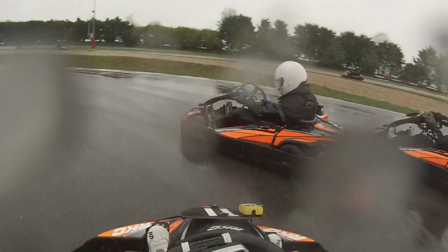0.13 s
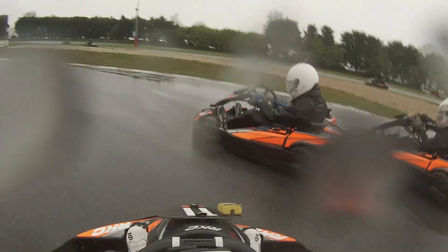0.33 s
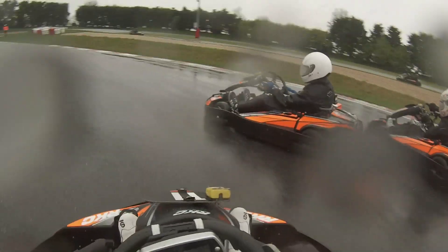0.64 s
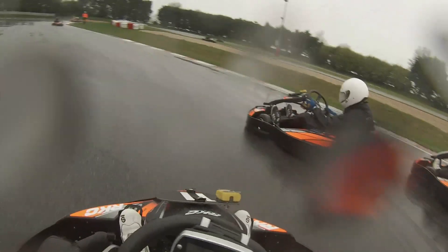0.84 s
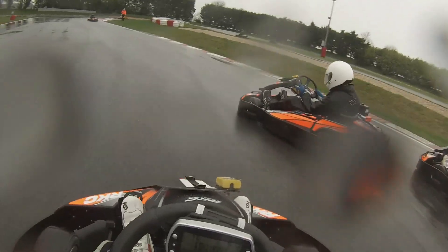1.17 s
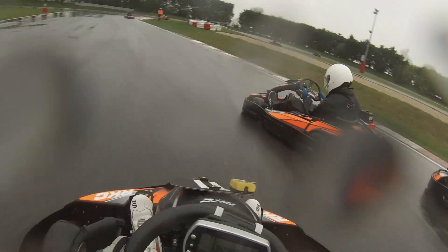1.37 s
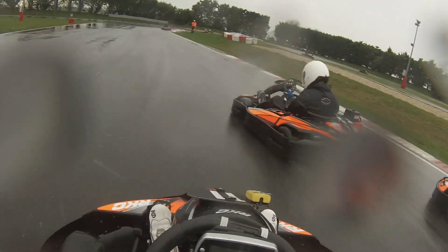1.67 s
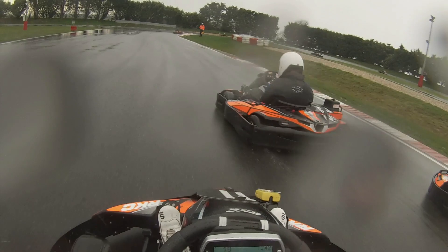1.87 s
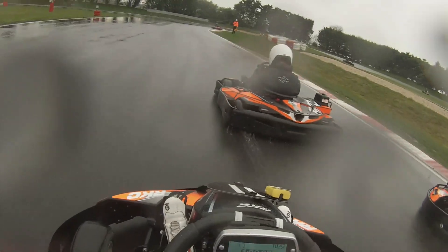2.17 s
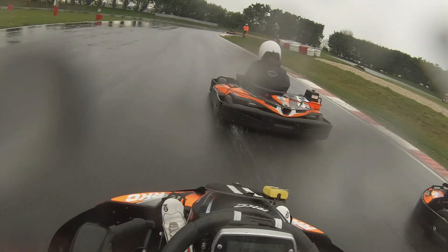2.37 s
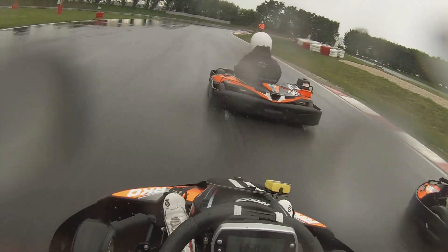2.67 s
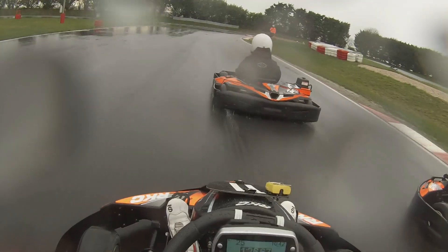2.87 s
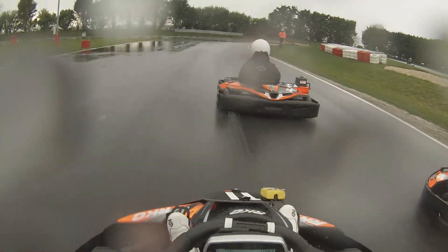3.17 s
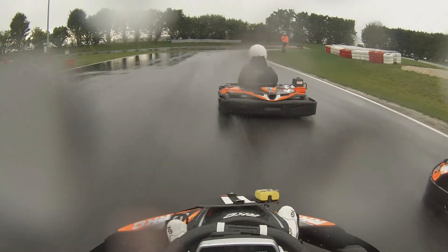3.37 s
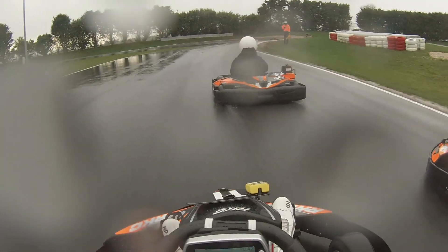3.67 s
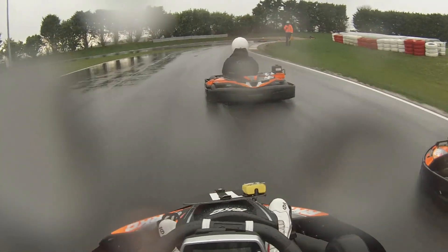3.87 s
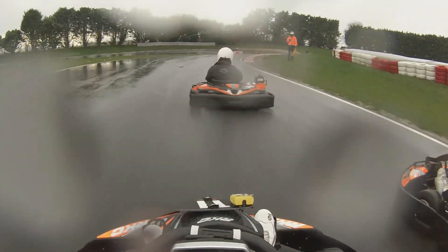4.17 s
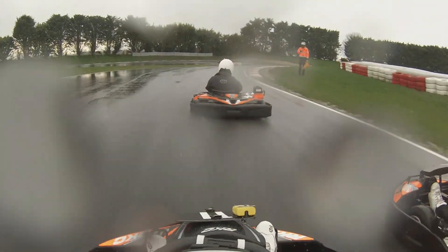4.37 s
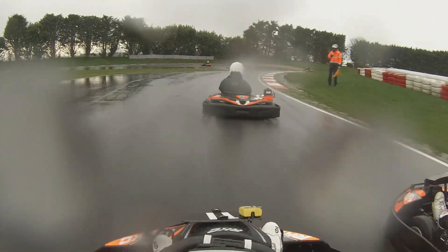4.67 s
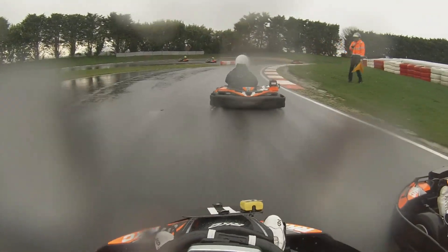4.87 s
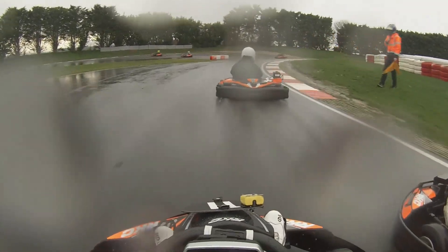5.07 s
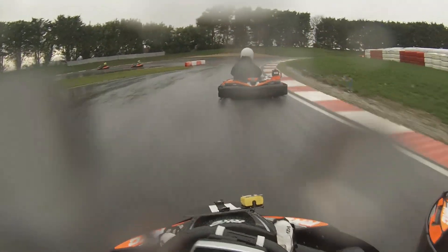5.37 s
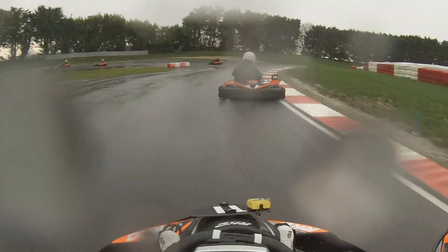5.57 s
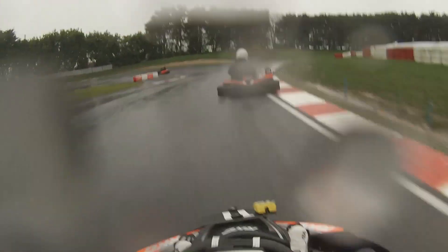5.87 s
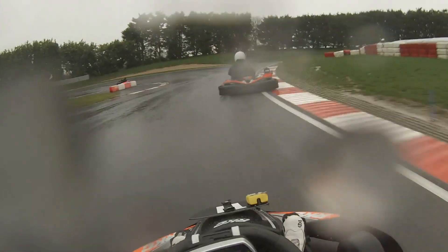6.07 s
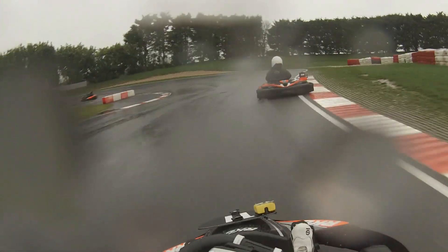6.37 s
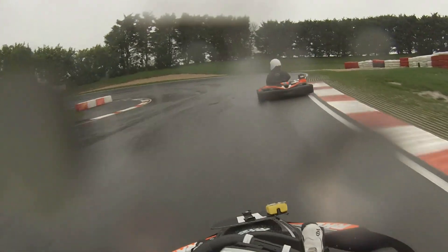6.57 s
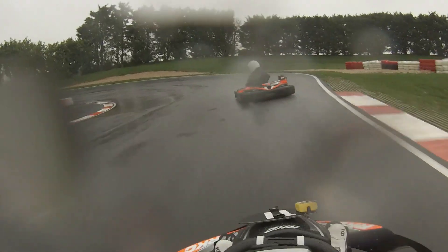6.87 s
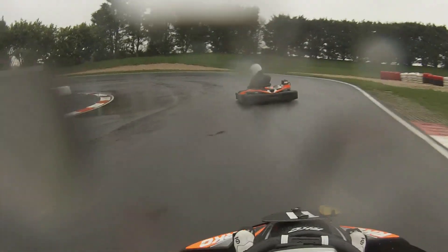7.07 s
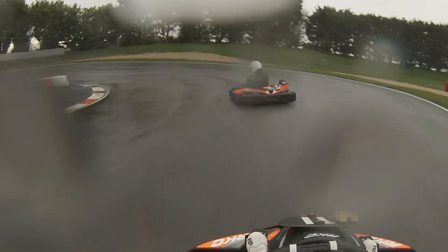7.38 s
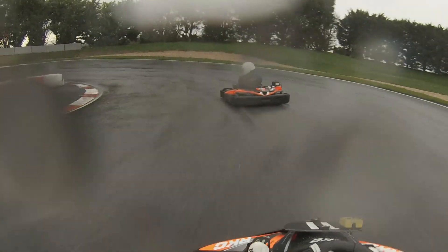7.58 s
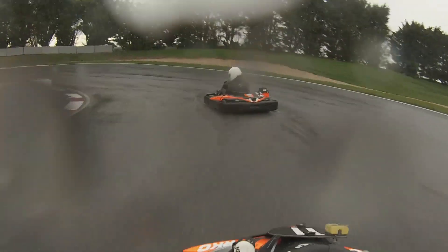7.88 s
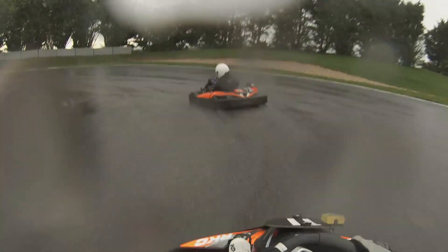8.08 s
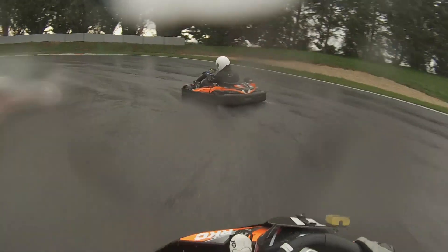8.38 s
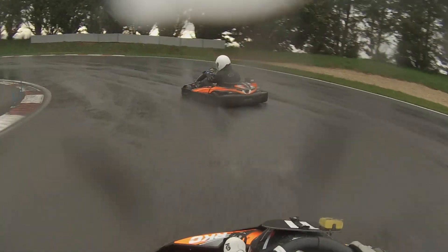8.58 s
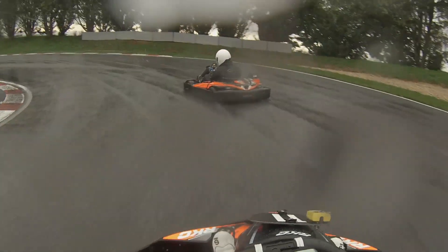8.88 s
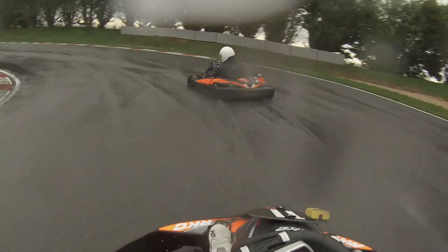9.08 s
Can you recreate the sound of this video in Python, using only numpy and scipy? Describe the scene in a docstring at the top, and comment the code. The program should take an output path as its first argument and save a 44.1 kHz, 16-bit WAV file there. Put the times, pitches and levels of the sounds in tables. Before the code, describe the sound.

From a kart on a soaked track: low chugging engine climbs into a buzzing drone, coasts down and picks up again, with wind buffets and ticking drops.

```python
"""Single-cylinder four-stroke kart engine on a wet track, heard inside a sealed helmet camera housing.
Firings shake seat and helmet in low orders and puff exhaust gas once a cycle; the throttle opens, closes for a
bend and is eased back on. The chain whines as sprocket teeth meet it, wind buffets the housing, wet tyres hiss,
bumps jolt the helmet and drops tick on the shell. Roar and hiss are noise through fixed housing resonances."""
import sys
import numpy as np
from scipy import signal
from scipy.fft import rfft, irfft
from scipy.io import wavfile
from scipy.ndimage import uniform_filter1d

SR = 44100
rng = np.random.default_rng(int(sys.argv[2]) if len(sys.argv) > 2 else 0)


def dump_mix(stems):
    """Bounce the given channels to the path in sys.argv[1] as a 16-bit WAV at rate SR."""
    frames = np.atleast_2d(stems).T  # one column per channel
    limited = np.clip(frames, -1, 1)  # hard clip at full scale
    pcm = np.round(limited * 32767).astype(np.int16)
    wavfile.write(sys.argv[1], SR, pcm)


def invert_db(x):
    """Field ratio 10**(x/20) for x, a level in decibels (scalar or array-like)."""
    u = np.asarray(x, float) / 20
    return 10 ** u


N = 406602
T = np.arange(N) / SR  # time in s

# The throttle opens, closes for the bend, and is eased back on out of it
THROTTLE_S, LIFT_S, REOPEN_S, REOPEN_SHARE = .565, 5, 8.9, 0.56

# Housing resonances, in groups.
# Each row: frequency in Hz, nominal width in Hz, relative level in dB.
BODY_MODES = [(191, 164, -1), (326, 163, -3), (444, 132, 1), (548, 105, -1), (689, 92, 2), (876, 133, -1)]
SHELL_MODES = [(1348, 205, -11.5), (1510, 237, -4)]
UPPER_MODES = [(2138, 280, -0.69), (2367, 383, -1.5)]
MID_MODES = [(3068, 233, 0.5), (3573, 460, 0.2), (4177, 540, -0.1), (4973, 854, -2)]


def level(x, db):
    """Normalization by energy: scale to a given rms."""
    return x * invert_db(db) / np.sqrt(np.mean(x ** 2))


def curves(table):
    """Linear interpolation in time: each column as a value per sample."""
    s, *columns = np.transpose(table)
    return [np.interp(T, s, c) for c in columns]


def walk(rate):
    """Smoothed random process: levels held 1 / rate s and slewed twice; rms spread a little under 0.6."""
    k = int(SR / rate)
    held = np.repeat(rng.standard_normal(N // k + 1), k)
    return 0.77 * uniform_filter1d(uniform_filter1d(held, k), k)[:N]


def resonance(x, hz, width):
    """Cascaded second-order resonance: the same band-pass twice, for steep skirts."""
    b, a = signal.iirpeak(hz, hz / (1.18 * width), fs=SR)
    return signal.lfilter(b, a, signal.lfilter(b, a, x))


def ring(modes, push, flicker_db, rate, blows=0):
    """Modal superposition: each resonance has its own turbulence under the shared push, and flickers alone."""
    total = 0
    for hz, width, db in modes:
        force = push * rng.standard_normal(N) + blows
        total = total + invert_db(db + flicker_db * walk(rate)) * resonance(force, hz, width)
    return total


def gusts():
    """Incoherent power addition: bell-shaped gusts over a steady flow give the wind level in dB."""
    calm_db = -32
    # Gusts of wind. Each row: time of the peak in seconds, peak level in dB,
    # half length in seconds (where the power has fallen to 1/e).
    gust_rows = [(0.048, -45, 0.08), (1.204, -25, 0.084), (2.3, -27, 0.34), (3.1, -27.5, 0.12),
                 (3.41, -27, 0.12), (4.105, -28.5, 0.5), (4.8, -29, .15), (5.437, -25, .12),
                 (5.85, -24, 0.11), (6.5, -26, 0.46), (7.805, -23.5, 0.053), (8.203, -29, 0.083),
                 (8.598, -30, 0.14), (9.044, -26.5, 0.12)]
    power = invert_db(calm_db) ** 2
    for s, db, half in gust_rows:
        power = power + invert_db(db) ** 2 * np.exp(-((T - s) / half) ** 2)
    return 10 * np.log10(power)


def wind(db):
    """Turbulent pressure on a bluff body: low-frequency shaped noise whose level follows the gusts."""
    # Wind spectrum on the housing, cut off above the helmet's resonance.
    # Each row: frequency in Hz, relative spectral level in dB per Hz.
    buffet = [(18, -49), (24, 3.5), (30, -1), (55, -1.5), (85, 2), (105, 1), (122, -7), (150, -19.5),
              (230, -24.5), (330, -49), (700, -120)]
    hz, shape_db = np.transpose(buffet)
    f = np.maximum(np.arange(N // 2 + 1) * SR / N, 1)
    shape = invert_db(np.interp(np.log(f), np.log(hz), shape_db))
    gust = irfft(rfft(rng.standard_normal(N)) * shape, N)
    sway = resonance(rng.standard_normal(N), 10.35, 3.8)  # the head nods in the airstream
    return level(gust * invert_db(3.4 * walk(12)), 0) * invert_db(db) + level(sway, -32.5)


def ping(modes, rise):
    """Impulse response of a struck shell: sines (Hz, dB) that rise for `rise` seconds, then decay."""
    t = np.arange(500) / SR
    envelope = t / rise * np.exp(1 - t / rise)
    return sum(invert_db(db) * np.sin(2 * np.pi * hz * t) for hz, db in modes) * envelope


def hits():
    """Impact excitation: each strike is a dull ring, a snap and a bright tick; faint spray patters between."""
    # Grit and drops that strike the shell. Each row: start in seconds, dull ring level in dB,
    # ring frequency in Hz, snap level in dB, bright tick level in dB.
    strikes = [(1.053, -20, 1530, -38, -57), (1.9715, -12.5, 1510, -23, -34),
               (2.037, -14.5, 1290, -39, -51), (2.9086, -18, 1450, -35, -49), (3.849, -13, 1510, -35, -46),
               (4.1699, -11, 1530, -32, -49), (4.2714, -25, 1360, -36, -45), (4.335, -24, 1540, -28, -45),
               (4.623, -15, 2070, -19, -32), (4.6524, -10, 2170, -26, -33), (4.9024, -38, 1520, -34, -45),
               (5.039, -26, 1490, -18, -34), (5.2504, -28, 1450, -37, -51), (5.4323, -10, 1490, -24, -45),
               (5.493, -29, 1480, -31, -41), (5.5087, -43, 1330, -22, -38), (5.672, -29, 1640, -23, -39),
               (5.7368, -17, 1620, -20, -42), (6.58, -23, 1610, -31, -45), (7.1835, -30, 1530, -29, -51),
               (7.5448, -23, 1550, -29, -50), (7.704, -21, 1570, -36, -31), (7.978, -30, 1380, -37, -52),
               (8.317, -16, 2580, -25, -52), (8.328, -21, 2300, -32, -50), (8.6289, -24, 1580, -28, -36),
               (8.729, -18.5, 1540, -35, -43), (8.8504, -30, 1540, -37, -51), (8.8817, -26, 1500, -36, -66),
               (9.0915, -15, 2480, -19.5, -53), (9.211, -22, 1600, -36, -44)]
    ringing, snaps, ticks = np.zeros(N + 500), np.zeros(N), np.zeros(N)
    patter = rng.random((900, 2))  # place and strength of each faint tick
    ticks[(patter[:, 0] * N).astype(int)] = invert_db(-62.5 - 4.0 * np.log(1 - patter[:, 1]))
    t = np.arange(500) / SR
    for s, ring_db, hz, snap_db, tick_db in strikes:
        i = int(s * SR)
        # a weaker partner tone rings on the other side of 1950 Hz
        tones = np.sin(2 * np.pi * hz * t) + 0.32 * np.sin(2 * np.pi * (3900 - hz) * t)
        ringing[i:i + 500] += invert_db(ring_db) * tones * np.exp(-(t / 0.003) ** 2)
        snaps[i + 20] = invert_db(snap_db)
        ticks[i + 30] = invert_db(tick_db)
    snap = ping([(3300, 1.3), (4600, 3.4)], 0.00017)
    tick = ping([(7600, 1), (10800, -2.5), (13200, -6)], 0.0002)
    return ringing[:N] + signal.fftconvolve(snaps, snap)[:N] + signal.fftconvolve(ticks, tick)[:N]


def bumps():
    """Transient response of a damped mass on a spring: a few low cycles that die fast."""
    # Bumps in the track that jolt the helmet. Each row: start in seconds,
    # level in dB (the envelope peaks 6 dB below it), ring frequency in Hz.
    jolts = [(0.099, -16, 45.8), (0.6, -18, 55), (0.439, -18, 65), (5.859, -12, 48.4), (5.969, -14.5, 103),
             (6.258, -13, 101), (6.448, -17, 91.5), (6.729, -11, 102), (7.419, -24, 83.4),
             (7.798, -16, 51.4), (8.339, -11, 53.8), (8.999, -5, 53.3)]
    out, t = np.zeros(N + 6000), np.arange(6000) / SR
    envelope = t / 0.022 * np.exp(1 - t / 0.011)
    for s, db, hz in jolts:
        i = int(s * SR)
        out[i:i + 6000] += invert_db(db) * np.sin(2 * np.pi * hz * t) * envelope
    return out[:N]


def tyres(throb, flutter, blows, load, spray_db):
    """Broadband flow noise through resonances: wet tyres hiss in the middle and top housing modes."""
    # Treble resonances of the housing.
    # Each row: frequency in Hz, nominal width in Hz, relative level in dB.
    top_modes = [(6650, 590, 6.5), (7410, 1170, 5), (8920, 1150, -7), (10950, 2400, -10),
                 (13200, 1800, -35.5)]
    # the hiss gains 0.59 dB per dB of road noise above -51 dB, and a little under throttle
    hiss_db = -38 + 0.59 * (spray_db + 51) + 1.77 * load
    hiss = ring(MID_MODES, invert_db(0.34 * throb + 1.3 * flutter), 0.42, 30, invert_db(-17) * blows)
    spray = ring(top_modes, invert_db(0.28 * throb + 1.0 * flutter), 0.61, 30)
    return level(hiss, 0) * invert_db(hiss_db) + level(spray, 0) * invert_db(spray_db)


def chain(turns, throb):
    """Tooth-mesh tone: sprocket teeth meet the chain; the tug of each cycle adds lines one order either side."""
    teeth_per_cycle = 26
    # Chain whine. Each row: time in seconds, level in dB before flicker.
    whine = [(0, -52.5), (2, -50), (2.6, -41.5), (3.3, -52), (3.7, -39), (4.3, -42), (4.7, -53), (5.4, -49),
             (6, -46), (6.8, -41), (7.3, -42.5), (7.8, -43.5), (8.3, -48.5), (8.6, -37), (8.9, -39),
             (9.22, -38)]
    db, = curves(whine)
    wander = .1 * walk(30) + .2 * walk(3) + .05 * throb  # in periods of the whine
    flicker_db = throb + 3.5 * walk(25) + 1.5 * walk(6)
    return np.sqrt(2) * invert_db(db + flicker_db) * np.sin(2 * np.pi * (teeth_per_cycle * turns + wander))


def revs():
    """Kinematics of the engine: firing rate in Hz per sample."""
    # Held by the slipping clutch, a steady climb, high revs held after the throttle closes,
    # then slowing for the bend. Each row: time in seconds, firing rate in Hz.
    firing_rate = [(0.0, 16.093), (2.18, 16.013), (2.92, 17.591), (5.17, 25.357), (5.85, 26.261),
                   (6.13, 25.136), (6.67, 25.911), (7.05, 25.365), (7.33, 23.846), (7.8, 23.28),
                   (8.08, 22.387), (8.9, 20.78), (9.22, 20.7)]
    return curves(firing_rate)[0]


def cycle(jitter=0.0073):
    """Phase as integrated rate: counts engine cycles, a firing at each whole number; crank speed trembles."""
    return .89 + np.cumsum(revs()) / SR + jitter * walk(14)


def throttle():
    """Piecewise-linear control: 1 while the pedal is down, 0 when coasting."""
    times = [THROTTLE_S - .03, THROTTLE_S, LIFT_S, LIFT_S + .1, REOPEN_S, REOPEN_S + .3]
    return np.interp(T, times, [0, 1, 1, 0, 0, REOPEN_SHARE])


def throb_depth(load):
    """Modulation depth in dB of the once-a-cycle puff: under load it shrinks as the revs rise."""
    coast_db, load_db, load_db_per_hz = .9, 4, -0.35
    rate = revs()
    return coast_db + load * (load_db + load_db_per_hz * (rate - rate[0]) - coast_db)


def exhaust(turns, throb_db):
    """Pulsating gas flow in dB: a sudden puff at the firing, a shoulder, then quiet; firings differ."""
    phase = turns % 1
    size = 1 + 0.22 * rng.standard_normal(400)[turns.astype(int)]
    puff = size * np.exp(-(phase / 0.27) ** 4) + 1.5 * (1 - phase) ** 1.4
    puff = uniform_filter1d(puff, size=110)
    return (puff - puff.mean()) / puff.std() * throb_db


def firings(turns, throb_db):
    """Impulsive excitation: one blow on the frame at each firing, strong only under load."""
    return np.diff(np.floor(turns), prepend=0) * np.clip(throb_db - .5, 0, 2) * invert_db(19.5)


def roar(throb, flutter, blows, load, rush_db):
    """Amplitude-modulated jet noise: puffs of exhaust gas and firing blows ring the housing."""
    # the body drone sits below the roar, and drops further when coasting after the throttle closes
    body_db = rush_db - 5.5 - 2.5 * (T > LIFT_S) * (1 - load)
    rush = ring(SHELL_MODES, invert_db(0.57 * throb + 0.48 * flutter), 0.99, 25, invert_db(-3) * blows)
    upper = ring(UPPER_MODES, invert_db(0.81 * throb + 0.57 * flutter), 1.0, 25, invert_db(-12) * blows)
    body = ring(BODY_MODES, invert_db(0.26 * throb + 1.2 * flutter), 1.0, 20, blows)
    return (level(rush, -1.3) + level(upper, -4.5)) * invert_db(rush_db) + level(body, 0) * invert_db(body_db)


def barks():
    """Transient gas jets: lone noise bursts, a fast rise and a bell-shaped fall, ring the housing."""
    # Lone exhaust barks: two misfiring pops before the throttle opens, one as it opens.
    # Each row: start in seconds, drive level in dB ahead of the resonances, nominal length in seconds.
    bursts = [(0.198, -21.5, .01), (0.425, -13, 0.014), (0.566, -8, 0.011)]
    env = np.zeros(SR)  # all within the first second
    for s, db, length in bursts:
        t = np.maximum(T[:SR] - s, 0)
        env += invert_db(db) * (1 - np.exp(-t / 0.0021)) * np.exp(-(t / max(1.5 * length, .003)) ** 2)
    gas = env * rng.standard_normal(SR)
    groups = [(13, SHELL_MODES), (5, UPPER_MODES), (-14, MID_MODES), (-7, BODY_MODES[:4]), (6.5, BODY_MODES[4:])]
    bark = np.zeros(SR)
    for group_db, modes in groups:
        for hz, width, db in modes:
            bark += invert_db(group_db + db) * resonance(gas, hz, width)
    return np.pad(bark, (0, N - SR))


def order_levels():
    """Forced vibration: dB of orders 1 to 6; the jolt's orders swell and fade across the seat's resonances."""
    # Vibration reaching the helmet. Each row: time in seconds, rocking at order 1 in dB,
    # crank imbalance at order 2 in dB, firing jolt in dB before the seat.
    shake = [(0.0, -38, -46.0, -65), (0.6, -33, -51, -39.5), (1.0, -44.0, -50, -39),
             (1.55, -40.0, -37, -32.5), (1.95, -36, -28, -36.0), (2.55, -21, -23, -29),
             (3.0, -30, -25.5, -32), (3.27, -30, -46, -34.5), (3.55, -23.5, -23.5, -32),
             (4.0, -33.5, -22.5, -44), (4.45, -18, -17, -24), (5.25, -17, -23.5, -24.5),
             (5.55, -35, -39, -35), (5.85, -32.5, -39, -52), (6.35, -31, -48, -38),
             (6.75, -21.5, -37.0, -28), (7.15, -37, -41, -32), (7.5, -56, -33, -38.5),
             (8.0, -49, -35, -35.5), (8.3, -39.0, -34, -26), (8.7, -47, -36.5, -26.5),
             (9.22, -30, -18, -36)]
    # How seat and helmet pass the jolt, orders 3 to 6. Each row: frequency in Hz, gain in dB.
    seat = [(48, 11.5), (54, -2), (63, -3.5), (72, -4), (86, 1.5), (97, -2.5), (106, -8), (118, -20),
            (150, -20)]
    rock_db, crank_db, jolt_db = curves(shake)
    hz, db = np.transpose(seat)
    jolts = [jolt_db + np.interp(np.log(k * revs()), np.log(hz), db) for k in range(3, 7)]
    return [rock_db, crank_db] + jolts


def orders(turns, levels_db, throb_db):
    """Fourier series of the cycle: a downward jolt after the firing at low revs, a heave before it at high."""
    lead, trail, jolt = .13, .2, .26  # in cycles
    rate = np.gradient(uniform_filter1d(turns, size=8000)) * SR
    slow = np.clip((21.5 - rate) / 4, 0, 1)  # 1 at low revs, 0 at high
    low = 0
    for k, db in enumerate(levels_db, start=1):
        if k == 1:
            shift = -trail  # the rocking always trails
        elif k == 2:
            shift = slow / 4  # the crank's imbalance leads at low revs
        else:
            shift = slow * ((1.1 - jolt * k) % 1 - .6)
        wave = np.cos(2 * np.pi * (k * (turns + lead) + shift))
        low = low + np.sqrt(2) * invert_db(db + 1.3 * walk(11)) * wave
    # under load the sharper firing adds a fading series of higher orders
    high = 0
    for k in range(7, 13):
        wave = np.cos(2 * np.pi * (k * turns + k * k / 40))
        high = high + invert_db(-34.0 - 2.52 * k + 8.3 * walk(7.2)) * wave
    # all orders are weak until the throttle opens
    pull = np.interp(T, [THROTTLE_S, THROTTLE_S + .03], [.3, 1])
    return pull * (low + np.clip(throb_db - .5, 0, 2) * high)


def scene():
    """Linear superposition: all sources as the microphone inside the housing gets them."""
    # Each row: time in seconds, exhaust roar reference level in dB, wet road noise level in dB.
    drive = [(0, -36.5, -60), (.5, -36, -57.5), (.7, -31.5, -57), (1.3, -30, -56), (2.0, -30, -53.5),
             (2.7, -29, -50.5), (3.0, -27.5, -50), (3.6, -26, -48), (4.4, -26, -47.5), (5.3, -25.5, -46),
             (6.0, -26.5, -48.5), (6.8, -27, -48.3), (7.4, -29.5, -51), (8.0, -30.5, -53), (8.9, -30, -54),
             (9.22, -28.5, -51.5)]
    rush_db, spray_db = curves(drive)
    load = throttle()
    throb_db = throb_depth(load)
    turns = cycle()
    throb = exhaust(turns, np.clip(throb_db, 0, 6))
    blows = firings(turns, throb_db)
    flutter = 0.74 * walk(60) + 0.31 * walk(9)  # turbulence shakes all bands together
    background = wind(gusts()) + hits() + bumps() + tyres(throb, flutter, blows, load, spray_db)
    engine = roar(throb, flutter, blows, load, rush_db) + barks() + orders(turns, order_levels(), throb_db)
    return (background + chain(turns, throb) + engine)[None]


def roll_off(x):
    """The treble ends steeply here."""
    return signal.sosfilt(signal.butter(12, 15700, fs=SR, output="sos"), x)


def record(dry):
    """Elliptic low-pass filtering: the camera cuts the band above 15.7 kHz."""
    low_pass = signal.ellip(8, .2, 70, 15700, fs=SR, output="sos")
    return roll_off(signal.sosfilt(low_pass, dry))


dry = scene()
out = record(dry)
dump_mix(out)
```